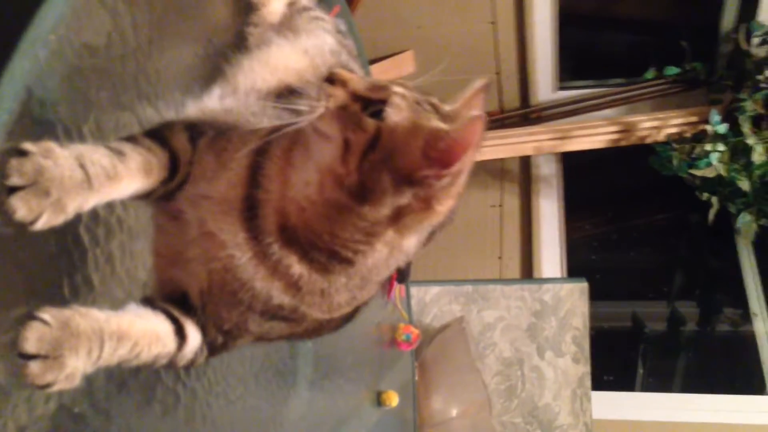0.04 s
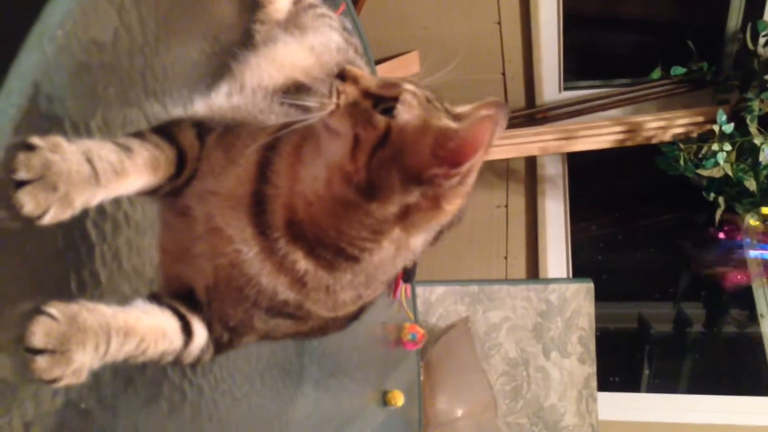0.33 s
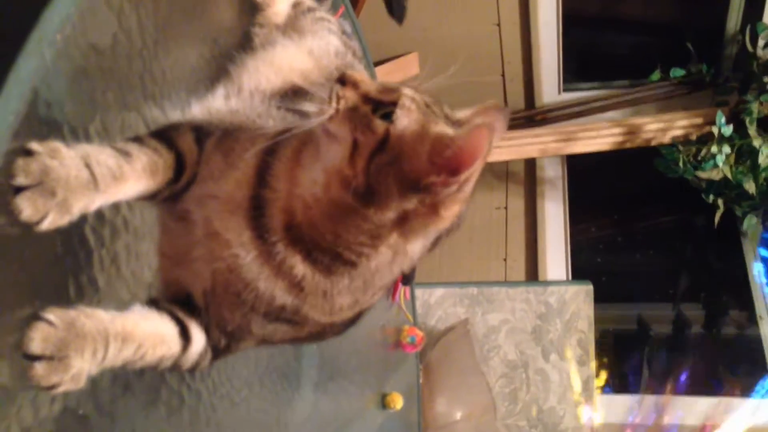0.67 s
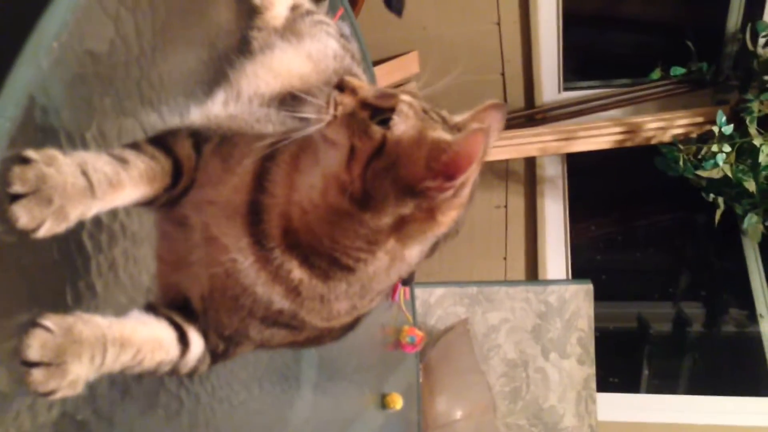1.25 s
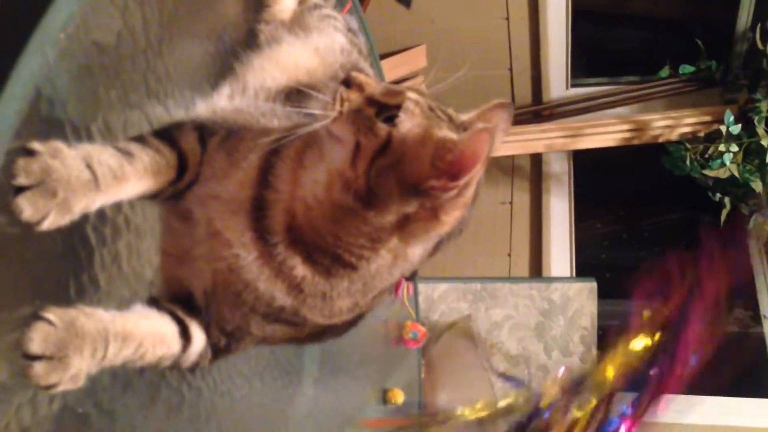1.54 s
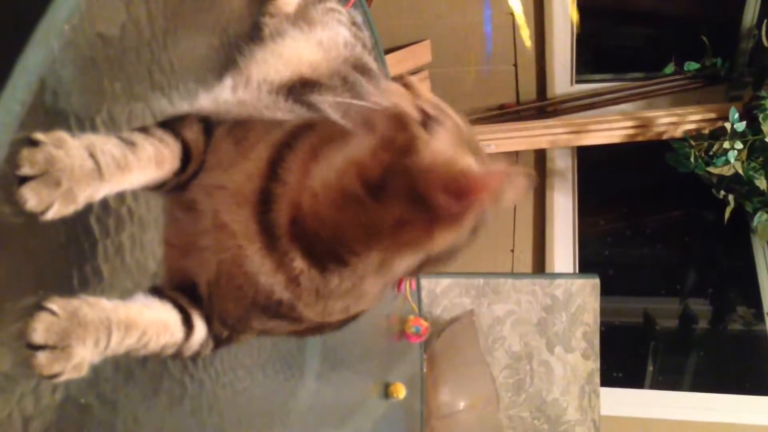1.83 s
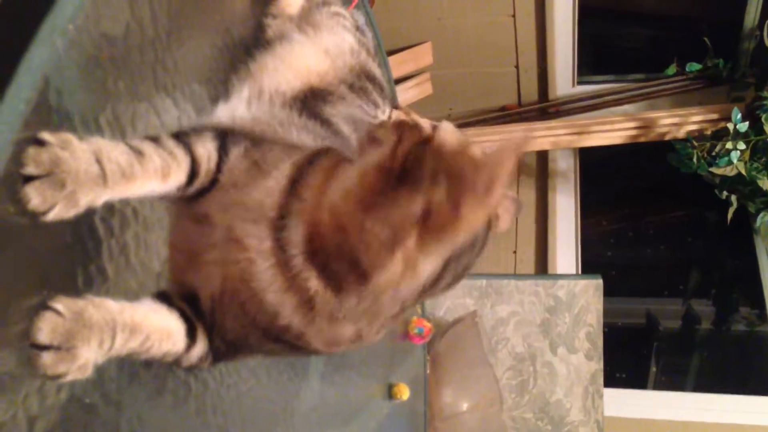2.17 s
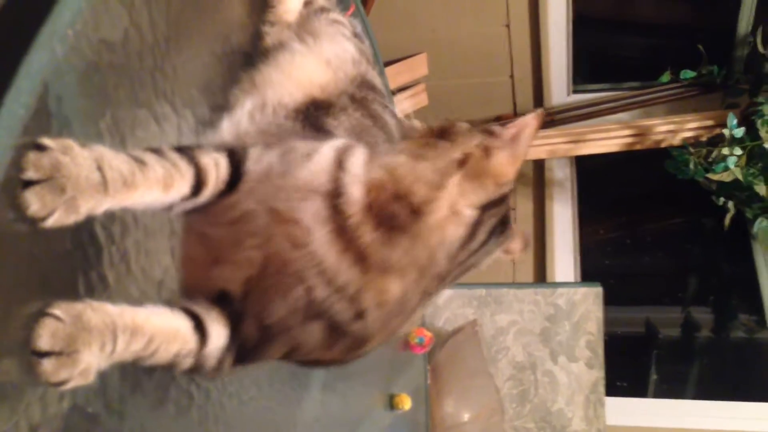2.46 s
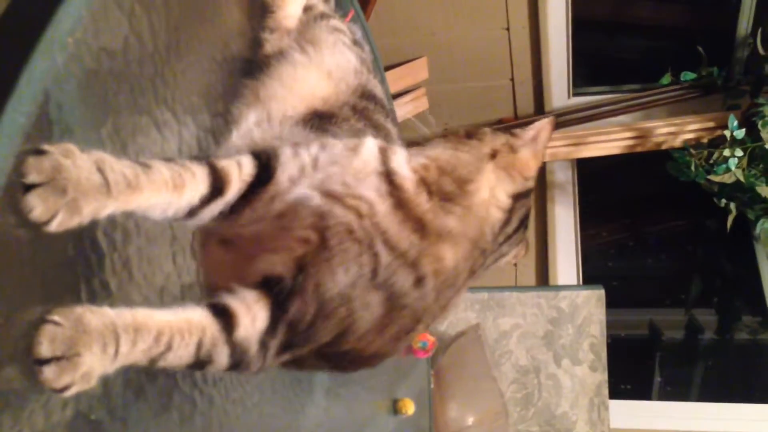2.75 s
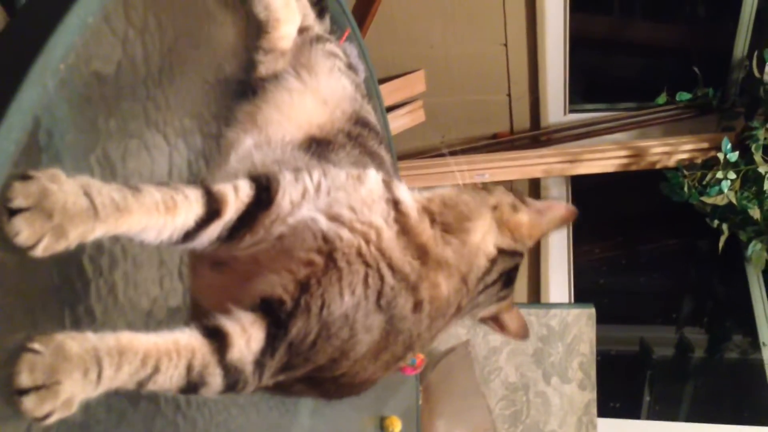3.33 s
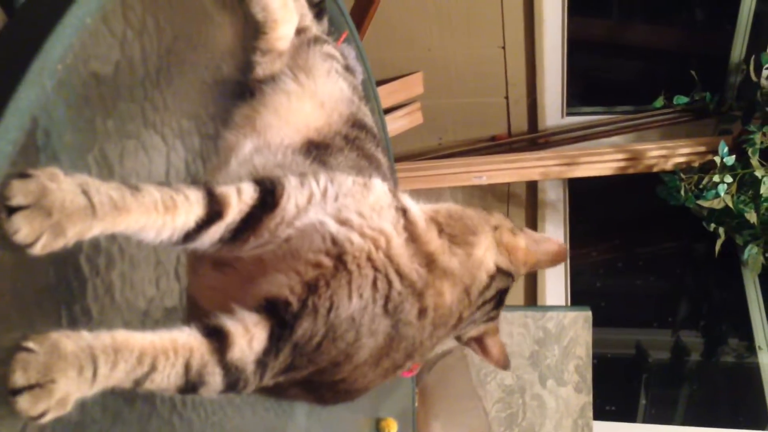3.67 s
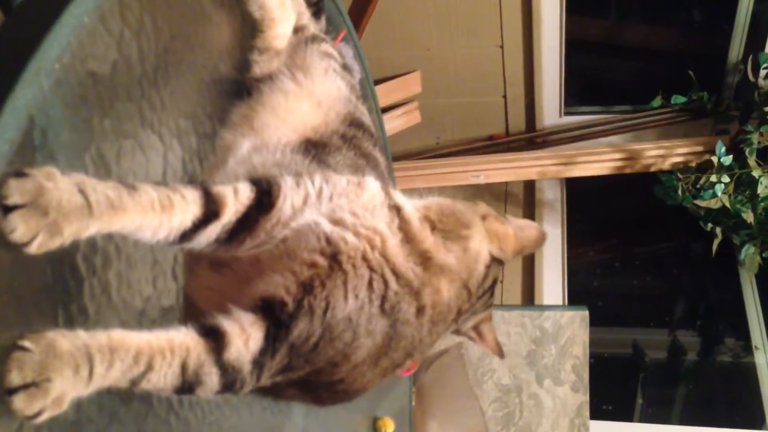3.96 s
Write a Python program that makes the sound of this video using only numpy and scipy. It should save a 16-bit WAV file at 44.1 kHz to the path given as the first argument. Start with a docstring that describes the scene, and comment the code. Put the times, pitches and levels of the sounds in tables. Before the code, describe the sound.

A tinsel wand is shaken close to the microphone, its foil strips crackling while a tiny bell ticks and jingles. The bell then stops, leaving a few faint rustles over the low hum of a quiet room.

```python
"""Tinsel wand with a jingle bell

A tinsel wand is swished close by in a quiet room. Its foil strips crackle and sizzle on every swing,
and two close swings also flutter and push air. A pellet knocks about in the tiny bell, ticking and
ringing the shell. Underneath sit room tone, a low appliance hum, a thin hiss and one faint scrape."""
import sys
import numpy as np
from scipy import signal
from scipy.fft import rfft, irfft
from scipy.io import wavfile
from scipy.ndimage import uniform_filter1d

SR = 44100
rng = np.random.default_rng(int(sys.argv[2]) if len(sys.argv) > 2 else 0)


def store_pcm(level_fs):
    """Save levels as 16-bit WAV."""
    pcm = np.round(np.clip(level_fs, -1, 1) * 32767).astype(np.int16)
    wavfile.write(sys.argv[1], SR, np.atleast_2d(pcm).T)


N = 176400

# Tone curves for the noise layers and the pellet's tick. Each row: frequency in Hz, relative level in dB.
ROOM_TONE_EQ = [(25, -41), (42, -21), (66, -7.5), (135, -12), (158, -3), (186, -6), (231, -4), (264, -11.5),
                (400, -13), (475, -17.5), (770, -15), (990, -21.5), (1180, -20.5), (1600, -24.5),
                (2300, -25), (2950, -32.5), (3200, -27.5), (3700, -30.5), (5200, -32), (7100, -32.5),
                (10000, -34), (15000, -35.5)]
HISS_EQ = [(4500, -37.5), (5550, -3), (5800, 5.5), (6150, 0.5), (6500, -8.5), (8000, -43.5)]
SCRAPE_EQ = [(2500, -30), (3900, -14), (4400, 3), (6500, 1), (8000, -7), (11000, -4), (15000, -16)]
FOIL_EQ = [(300, -30.5), (1000, -6.5), (2000, -5.5), (3000, -1), (4200, 0.5), (5500, 4), (7300, 3),
           (9000, 0.5), (12000, -5.5), (15000, -7.5)]
SIZZLE_EQ = [(3000, -31), (7000, -5), (10000, 0.5), (15000, -5.5)]
FLUTTER_EQ = [(150, -14), (350, 6), (480, 0), (650, 4), (1000, -10), (1500, 0), (2100, -5), (3000, -10),
              (5000, -8), (12000, -34)]
AIR_EQ = [(40, -38), (100, -16), (170, -2.5), (245, 3), (330, -8), (500, -23), (1000, -35), (4000, -47)]
TICK_EQ = [(2000, -51), (4300, -28), (4800, -18), (5200, -4), (6300, -3.5), (7100, 2.5), (7500, 3.5),
           (7900, -3), (8600, -7), (9600, -24), (15000, -25)]
# The appliance's drone. Each row: frequency in Hz, level in dB.
HUM_TONES = [(57.5, -77), (79.6, -72), (119.9, -66), (160.2, -59), (480, -76.5), (574, -74.5)]
# Small scrapes. Each row: peak time in seconds, level in dB, fall in seconds.
SCRAPES = [(2.91, -56, .007)]
# Swings of the wand. Each row: fastest moment in seconds, rustle level in dB,
# sizzle in dB relative to that level, rise and fall in seconds.
SWINGS = [(.005, -53, -22, .03, 0.096), (.087, -45.5, -12, 0.062, 0.035), (.25, -58.5, -18, 0.054, 0.054),
          (0.341, -43.5, -9, 0.013, .012), (.378, -35, -5.5, 0.022, 0.025), (.665, -60, -1, .03, 0.086),
          (.792, -55, -4.5, 0.16, 0.074), (.95, -57.5, -19, 0.077, 0.045), (1.09, -62.5, -10, 0.089, 0.11),
          (1.32, -56, -14, 0.058, 0.074), (1.833, -57.5, -7, 0.047, 0.037), (2.01, -65, -7, 0.1, .03),
          (2.86, -66.5, -20, 0.21, 0.21), (3.375, -63.5, -5, 0.027, .025)]
# Close swings that flap the strips. Each row: peak time in seconds, flutter level in dB,
# air level in dB, rise and fall in seconds.
CLOSE_SWINGS = [(0.067, -46, -60, 0.0047, 0.05), (.372, -39, -38.5, 0.0034, 0.022)]
# Pellet hits on the shell. Each row: start in seconds, then gains in dB for the main ring,
# the tick, the first overtone and the second overtone.
PELLET_HITS = [(.001, -35, -41, -70, -62), (0.0171, -36, -39, -66, -54), (.034, -42, -41, -66, -60),
               (.2483, -53, -58, -75, -75), (0.3471, -32.5, -32, -52, -54), (.388, -39, -42, -52, -52),
               (0.416, -34, -36, -54, -46), (.438, -42, -40, -53, -54), (.449, -40.5, -37, -60, -48),
               (.4673, -43.5, -48, -58, -60), (.629, -51, -44, -68, -70), (.637, -48, -54, -72.5, -72),
               (.650, -51, -42, -58, -62), (0.6643, -41, -37, -68, -68), (0.6668, -52, -36, -68, -68),
               (.816, -55, -50, -72, -72), (0.842, -56, -56, -75, -75), (0.858, -56, -56, -75, -75),
               (0.9438, -28.5, -31, -68, -72), (0.958, -43, -51, -70, -74), (0.9622, -45, -49, -70, -72),
               (.981, -53, -56, -75, -75), (1.127, -57, -60, -62, -72), (1.134, -51, -58, -60, -72),
               (1.14, -46, -55, -55, -70), (1.152, -48, -47, -60, -72), (1.175, -53, -50, -70, -72),
               (1.2973, -36, -34.5, -51, -63), (1.3053, -38, -37, -54, -64), (1.3294, -39.5, -38, -50, -66),
               (1.3366, -43, -34, -66, -57), (1.348, -48, -39, -57, -59), (1.3518, -49, -42, -62, -63)]
# The bell's main ring. Each row: frequency in Hz, relative level in dB, 60 dB decay time in seconds.
RING_MODES = [(5245, -4, 0.11), (5280, -19.5, 0.059)]
# The bell's high shimmer. Each row: frequency in Hz, 60 dB decay time in seconds.
BELL_OVERTONES = [(11930, 0.094), (13200, 0.075)]

ROOM_TONE_DB, HISS_DB = -55, -74.5
HUM_WAVER_DB, HUM_DRIFT_HZ = 1.5, 0.71
SNAPS_PER_S, SNAP_SPREAD_DB, RUB_SHARE = 2000, 3.5, 0.54
BOUNCE_GAP_S, FIRST_BOUNCE_DB, BOUNCE_LOSS_DB = .0045, -13, 1
BUZZ_DEPTH, BUZZ_HZ = .28, 322
BELL_LOW_HZ = 4540  # the small shell radiates little below this


def undb(db):
    """Decibels to gain."""
    return 10 ** (np.asarray(db) / 20)


def unit(x):
    """Scale to rms 1."""
    return x / np.sqrt(np.mean(x ** 2))


def eq_impulse(curve, size=8192):
    """Minimum-phase impulse response of a tone curve."""
    hz, db = np.array(curve, float).T
    bin_hz = np.maximum(np.arange(size // 2 + 1) * SR / size, 1)
    gain = undb(np.interp(np.log(bin_hz), np.log(hz), db))
    cepstrum = irfft(np.log(gain))
    cepstrum[1:size // 2] *= 2
    cepstrum[size // 2 + 1:] = 0
    return irfft(np.exp(rfft(cepstrum)))


def colour(x, curve):
    """Shape a steady texture with a tone curve, at rms 1."""
    return unit(irfft(rfft(x) * rfft(eq_impulse(curve), N), N))


def noise(curve):
    """Coloured noise at rms 1."""
    return colour(rng.standard_normal(N), curve)


def wander(rate_hz):
    """Smooth random modulation at rms 1."""
    hold = int(SR / rate_hz)
    steps = np.repeat(rng.standard_normal(N // hold + 1), hold)
    return unit(uniform_filter1d(uniform_filter1d(steps, hold), hold)[:N])


def swell(at, rise, fall):
    """Envelope peaking at 1; rise and fall are exponential time constants."""
    t = np.arange(N) / SR - at
    return np.exp(-np.abs(t) / np.where(t < 0, rise, fall))


def add(track, at, sound):
    """Mix a sound in at a time in seconds."""
    start = min(max(int(at * SR), 0), N)
    track[start:start + len(sound)] += sound[:N - start]


def background():
    """The bed: room tone, a thin high hiss and an appliance hum wavering in pitch and level."""
    bed = undb(ROOM_TONE_DB) * noise(ROOM_TONE_EQ)
    bed += undb(HISS_DB + 1.3 * wander(12)) * noise(HISS_EQ)
    for hz, db in HUM_TONES:
        phase = 2 * np.pi * np.cumsum(hz + HUM_DRIFT_HZ * wander(9.12)) / SR
        bed += np.sqrt(2) * undb(db + HUM_WAVER_DB * wander(12)) * np.sin(phase)
    return bed


def room(x, wet_db, t60=.25, predelay_s=.005):
    """The direct sound plus a short diffuse tail from the walls."""
    t = np.arange(SR // 2) / SR
    tail = rng.standard_normal(len(t)) * np.exp(-np.log(1000) * t / t60) * (t > predelay_s)
    return x + undb(wet_db) * signal.fftconvolve(x, tail / np.linalg.norm(tail))[:N]


def crinkle():
    """Dense snaps of foil, a few larger than the rest, over the smooth rub of strip on strip."""
    snaps = (rng.random(N) < SNAPS_PER_S / SR) * np.sign(rng.standard_normal(N))
    snaps *= undb(SNAP_SPREAD_DB * np.minimum(rng.exponential(size=N), 4))
    rub = rng.standard_normal(N)
    return np.sqrt(1 - RUB_SHARE) * unit(snaps) + np.sqrt(RUB_SHARE) * rub


def scrape():
    """A faint short scrape, like a cat shifting on a table."""
    envelope = sum(undb(db) * swell(at, .001, fall) for at, db, fall in SCRAPES)
    return envelope * colour(crinkle(), SCRAPE_EQ)


def tinsel():
    """Foil rustle and a fine sizzle swell with each swing; close swings add flutter and a push of air."""
    rustle_power, sizzle_power = np.zeros(N), np.zeros(N)
    for at, db, sizzle_db, rise, fall in SWINGS:
        envelope = undb(db) * swell(at, rise, fall)
        rustle_power += envelope ** 2
        sizzle_power += (undb(sizzle_db) * envelope) ** 2
    swish = np.sqrt(rustle_power) * colour(crinkle(), FOIL_EQ)
    swish += np.sqrt(sizzle_power) * colour(crinkle(), SIZZLE_EQ)
    flutter, air = colour(crinkle(), FLUTTER_EQ), noise(AIR_EQ)
    for at, flutter_db, air_db, rise, fall in CLOSE_SWINGS:
        swish += swell(at, rise, fall) * (undb(flutter_db) * flutter + undb(air_db) * air)
    return swish


def shell_mode(hz, t60, size=16000):
    """One resonance of the bell's shell, a fading sine."""
    t = np.arange(size) / SR
    return np.sin(2 * np.pi * hz * t) * np.exp(-np.log(1000) * t / t60)


def jingle_bell(bounces=6):
    """Each pellet hit ticks and rings the shell anew; the pellet then bounces and rolls."""
    shell, ticks = np.zeros(N), np.zeros(N)
    tick = eq_impulse(TICK_EQ, size=512)
    tick /= np.abs(tick).max()
    for at, ring_db, tick_db, *overtone_dbs in PELLET_HITS:
        detune = 1 + .0022 * rng.standard_normal()
        shell[int(at * SR):] = 0  # the hit chokes the previous ring
        ring = sum(undb(db) * shell_mode(hz * detune, t60) for hz, db, t60 in RING_MODES)
        add(shell, at, undb(ring_db) * ring)
        for (hz, t60), db in zip(BELL_OVERTONES, overtone_dbs):
            add(shell, at, undb(db) * shell_mode(hz * detune, t60))
        add(ticks, at, undb(tick_db) * tick)
        gaps = BOUNCE_GAP_S * (0.38 + 1.2 * rng.random(bounces))
        for bounce, delay in enumerate(np.cumsum(gaps)):
            add(ticks, at + delay, undb(tick_db + FIRST_BOUNCE_DB - bounce * BOUNCE_LOSS_DB) * tick)
    buzz = 1 + BUZZ_DEPTH * wander(BUZZ_HZ)  # the rolling pellet shakes the ring
    low_cut = signal.butter(6, BELL_LOW_HZ, "high", fs=SR, output="sos")
    return signal.sosfilt(low_cut, ticks + shell * buzz)


def scene():
    """Tinsel, scrape and bell with a touch of room, over the bed; both channels are the same."""
    mono = room(tinsel() + scrape(), wet_db=-11.5) + room(jingle_bell(), wet_db=-11) + background()
    return np.array([mono, mono])


def record(dry):
    """A steep high cut at 15.4 kHz takes off the very top."""
    high_cut = signal.ellip(12, .1, 70, 15400, fs=SR, output="sos")
    return signal.sosfilt(high_cut, dry)


dry = scene()
out = record(dry)
store_pcm(out)
```